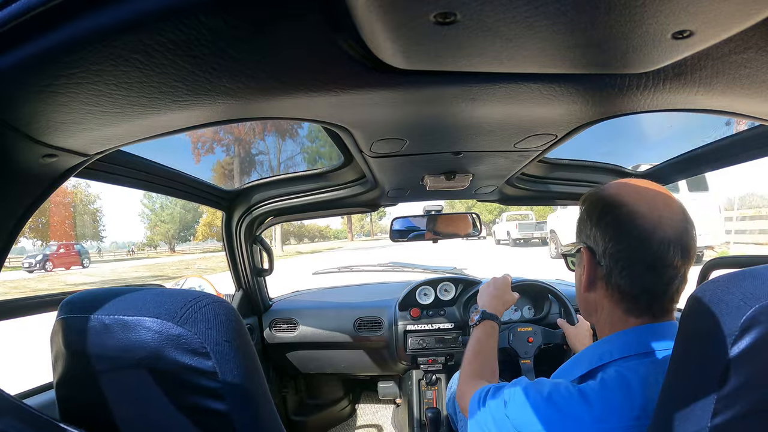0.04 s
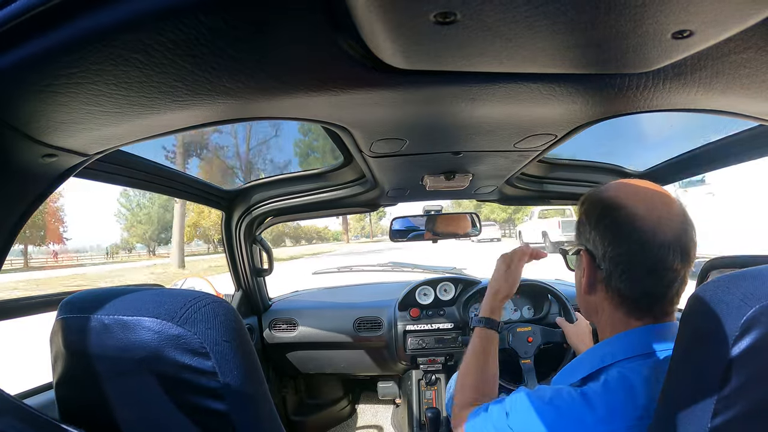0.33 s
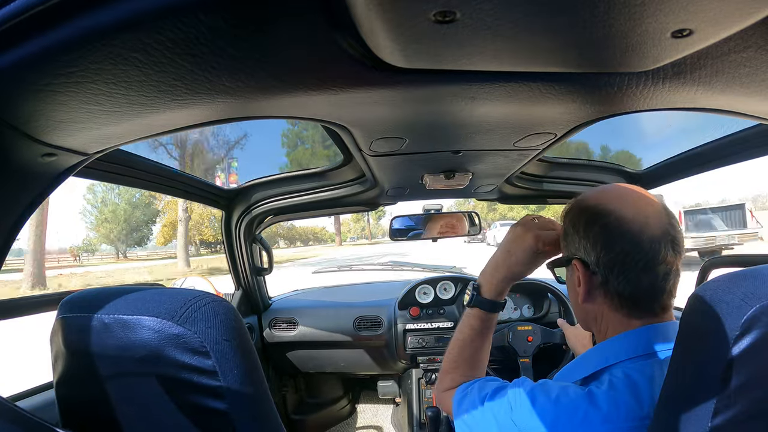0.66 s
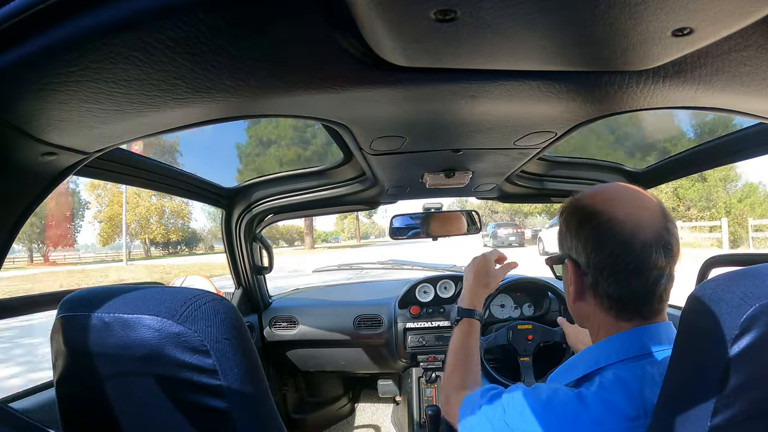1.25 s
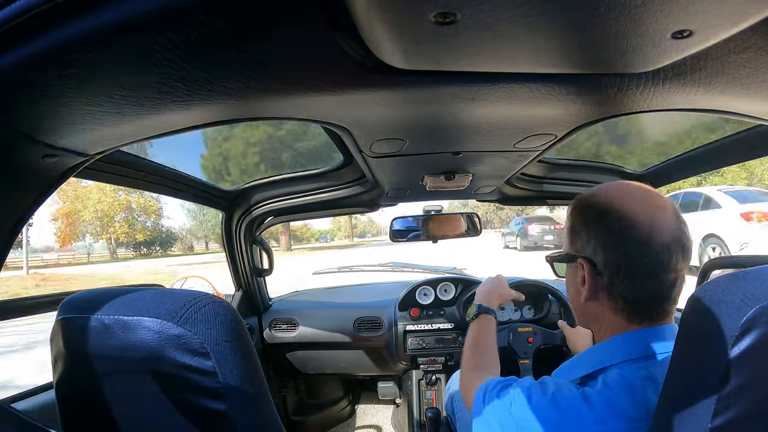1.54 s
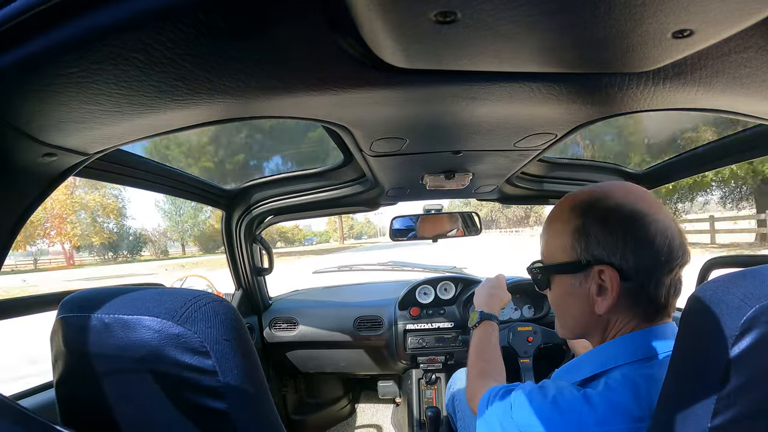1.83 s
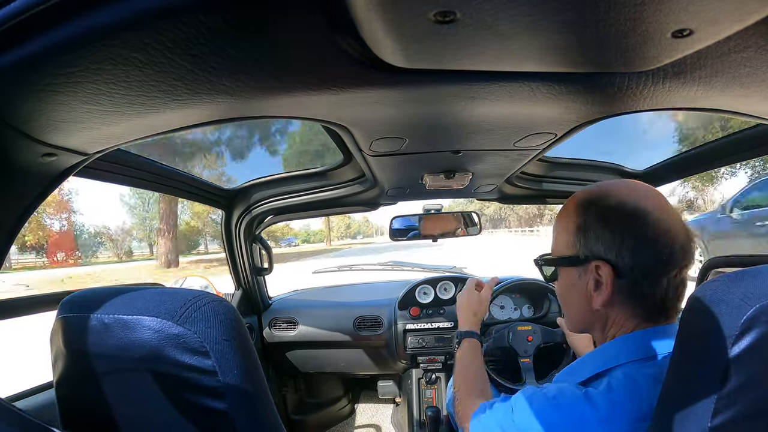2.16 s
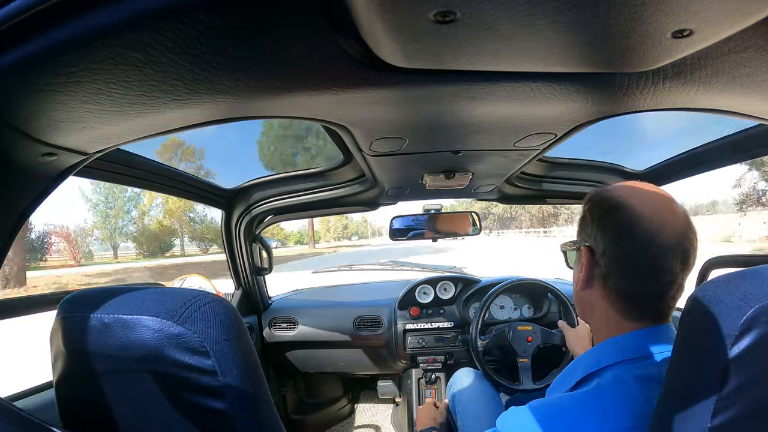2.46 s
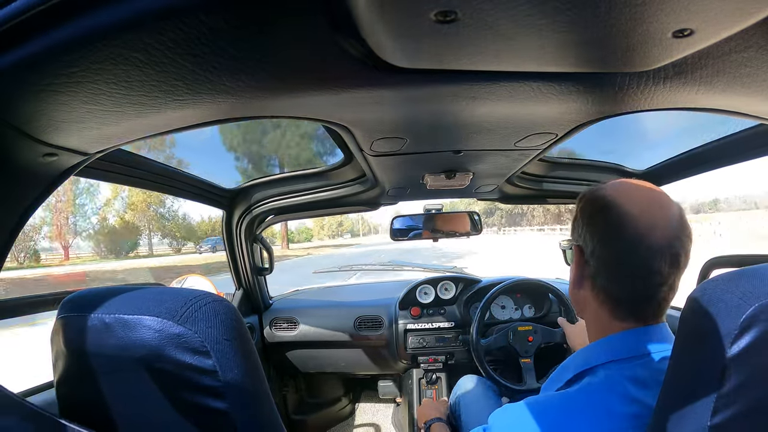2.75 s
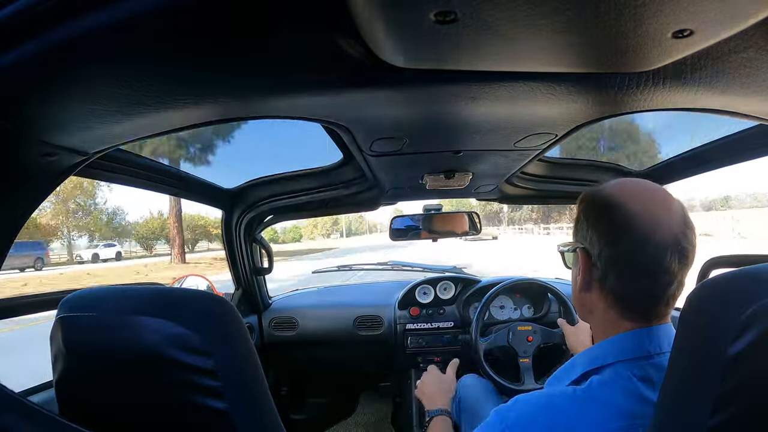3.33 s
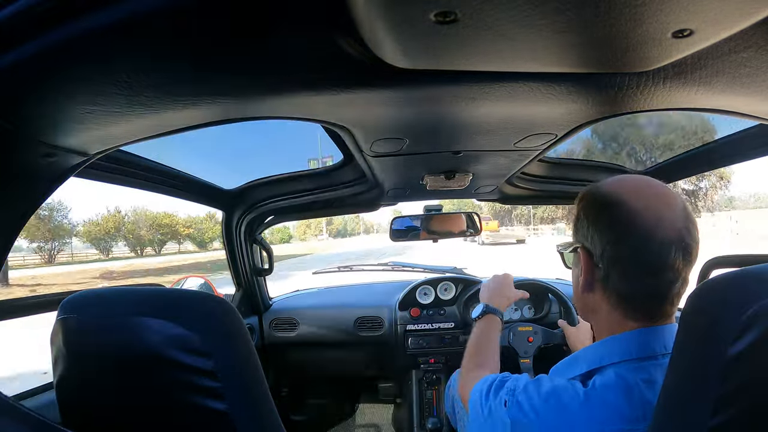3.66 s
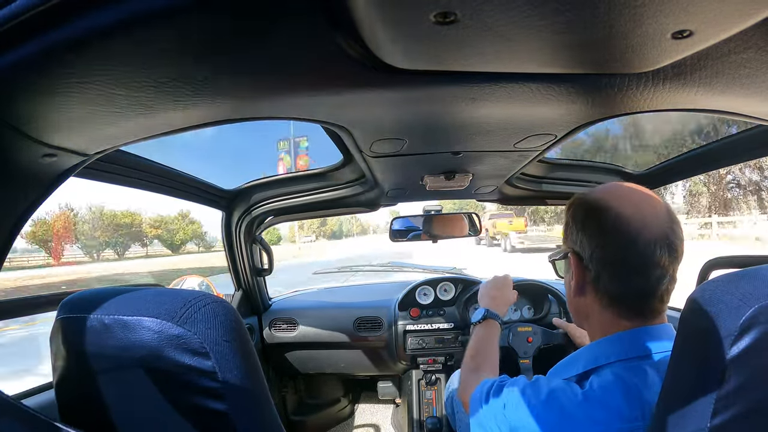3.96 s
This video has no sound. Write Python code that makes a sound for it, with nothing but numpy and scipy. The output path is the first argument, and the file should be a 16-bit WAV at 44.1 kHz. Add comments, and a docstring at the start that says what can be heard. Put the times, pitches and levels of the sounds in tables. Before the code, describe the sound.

A small car's engine drones and climbs steadily over low road rumble, heard from behind the seats. The throttle lifts for a gear change, the turbo lets out a hiss and quick falling chirps, and the engine pulls again.

```python
"""Inside a small car on the move, a stereo microphone behind the seats, road rumble all around.
The three-cylinder turbo engine pulls, its orders sweeping through the cabin's resonances, while
intake air rushes and the turbo and alternator whine faintly. Near 2.8 s the throttle lifts for a
gear change: trapped boost spits and flutters in falling chirps, the revs sink, then the load returns."""
import sys
import numpy as np
from scipy import signal
from scipy.fft import rfft, irfft
from scipy.io import wavfile
from scipy.ndimage import uniform_filter1d, minimum_filter1d

SR = 44100
rng = np.random.default_rng(int(sys.argv[2]) if len(sys.argv) > 2 else 0)


def wav_out(sig):
    """Save sig, one row per channel (or a flat mono array), as 16-bit PCM at SR to the path in sys.argv[1]."""
    wavfile.write(sys.argv[1], SR, np.round(np.clip(np.atleast_2d(sig).T, -1, 1) * 32767).astype(np.int16))


N = 176400
T, HZ = np.arange(N) / SR, np.fft.rfftfreq(N, 1 / SR)
RELEASE_S = 2.768  # the trapped boost starts to escape


def amp(db):
    """Decibels to gain."""
    return 10 ** (np.asarray(db) / 20)


def unit(x):
    """Scales to rms 1."""
    return x / np.sqrt(np.mean(x ** 2) + 1e-20)


def curve(rows, column=1):
    """One column of a time table at every sample."""
    rows = np.asarray(rows, float)
    return np.interp(T, rows[:, 0], rows[:, column])


def spectrum(rows, hz=HZ):
    """A frequency table, interpolated on a log axis."""
    f, value = np.transpose(rows)
    return np.interp(np.log(hz + 1), np.log(f + 1), value)


def drift(rate_hz):
    """Random wander of rms 1, mostly slower than rate_hz."""
    return unit(irfft(rfft(rng.standard_normal(N)) / np.sqrt(1 + (HZ / rate_hz) ** 4), N))


def noise(gain):
    """Stereo noise of rms 1 with a given spectrum, near mono in the bass."""
    # likeness of the microphone's two sides: f/Hz, correlation
    likeness = [(25, 1), (125, 0.98), (250, 1), (500, 0.74), (1000, 0.86), (2000, 0.56), (4000, 0.82),
                (8000, 0.85), (12000, 0.44)]
    left, other = rfft(rng.standard_normal((2, N)))
    alike = spectrum(likeness)
    right = alike * left + np.sqrt(1 - alike ** 2) * other
    return unit(irfft(np.array([left, right]) * gain, N))


def resonance(hz, width_hz):
    """Complex response of one mode."""
    return 1 / (1 + 2j * (HZ - hz) / width_hz)


def throb(hz, width_hz, evenness):
    """A narrow resonance shaken at random, its swells partly evened out."""
    shaken = signal.hilbert(noise(abs(resonance(hz, width_hz * 2)) ** 3))
    power = np.mean(abs(shaken) ** 2, 0)
    return unit(shaken.real / (power + .1) ** (evenness / 2))


def cabin_echo(x, t60=.16, wet_db=-3):
    """Direct sound plus dense, short reflections from glass and trim near the microphone."""
    t = T[:SR // 4]
    taps = rng.standard_normal((2, len(t))) * (rng.random((2, len(t))) < .05)
    taps *= (t > .002) * amp(-60 * t / t60)
    taps *= amp(wet_db) / np.linalg.norm(taps, axis=1, keepdims=True)
    return x + signal.fftconvolve(np.atleast_2d(x), taps, axes=1)[:, :N]


def engine(cycle_hz, cycles, load_db, waver=.14, jitter_cycles=.0016, growl_hz=660, growl_width_hz=70):
    """Three firings a cycle make slightly uneven orders, coloured by the cabin on the way back."""
    # low orders: multiple of the cycle rate, base level/dB, dB per dB of load
    orders = [(2, -23.5, 0.59), (3, -27.5, 0.7), (4, -25.5, 0.87), (5, -27, 0.65), (6, -21.5, 1.4),
              (7, -38, 1.2), (8, -48.5, .4), (9, -35.5, 1.86), (10, -50.5, 2.7), (11, -52.5, 1),
              (12, -37, 3.7), (13, -46, 0.5), (14, -46, 1.7), (15, -46.5, 0.69), (16, -44, 1.3),
              (17, -40.5, 0.9), (18, -46, 1.1)]
    # pumping against the shut throttle: multiple of the cycle rate, level/dB
    pumping_orders = [(2, -25), (3, -31), (4, -32), (6, -31)]
    # pumping starts, is full, starts to fade, has gone: t/s
    pumping_times = [2.76, 3.05, 3.32, 3.46]
    # cabin response from engine to microphone: f/Hz, gain/dB
    cabin = [(75, 2), (85, -3), (95, 4), (110, 6), (122, -2.5), (135, 0), (158, -2.5), (200, -7),
             (228, 1.5), (248, 0.5), (270, 2.5), (300, 0), (352, 5), (385, -3.5), (405, 11), (425, -2.5),
             (440, 0.5), (470, -12.5), (505, 1.5), (550, 4.5), (592, 4.5), (612, 11), (634, 3), (655, 14),
             (672, 15.5), (692, 11), (732, 3.5), (757, -7), (790, -3), (920, -3), (2000, -4.5)]
    # lift of the band around growl_hz: t/s, gain/dB
    growl = [(0, -5), (.35, -2), (.47, 4), (.8, 2.5), (1.13, 1), (1.25, -2), (1.6, -.5), (2.03, -5),
             (2.16, 3), (2.66, -.5), (2.76, 6), (2.86, -2), (3.3, -8), (3.68, 9), (4, 7)]
    # upper orders fall 12 dB an octave; every third, a firing harmonic, stands out
    upper = [(k, -47.5 - 12 * np.log2(k / 20) + 5.5 * (k % 3 == 0), 1) for k in range(19, 50)]
    cycles = cycles + jitter_cycles * drift(24)
    coasting = np.interp(T, pumping_times, [0, 1, 1, 0])
    out, growl_db = np.zeros((2, N)), curve(growl)
    for order, db, follows in orders + upper:
        hz = order * cycle_hz
        colour_db = spectrum(cabin, hz) + growl_db / (1 + ((hz - growl_hz) / growl_width_hz) ** 4)
        firing = amp(db + follows * load_db + colour_db)
        pumping = coasting * amp(dict(pumping_orders).get(order, -np.inf))
        level = np.hypot(firing, pumping) * (1 + waver * drift(10.3))
        phase = 2 * np.pi * (order * cycles + rng.random())
        spread = .16 * np.sqrt(order / 10) * rng.choice([-1, 1])
        out += np.sqrt(2) * level * np.cos([phase + spread, phase - spread])
    return out


def rush(cycles, load_db, level_db=-34.5, pulsing=.067, flicker_db=.85):
    """Intake and mechanical noise pulses with the crankshaft; panels and ducts ring with the load."""
    # colour of the rush: f/Hz, relative level/dB
    colour = [(120, -8), (250, 0), (400, 6.5), (520, -1), (800, -3), (1100, -3.5), (1800, -8.5),
              (2200, -13), (3000, -12), (4000, -14.5), (5400, -18.5), (5800, -22), (7700, -26), (8400, -31),
              (10300, -35), (11200, -40.5), (12200, -36.5), (13500, -46.5), (15000, -60.5)]
    # swell of the rush: t/s, gain/dB
    swell = [(0, -7), (.2, -1), (.5, 1.5), (1.2, 2), (2, 0.5), (2.75, 3), (2.85, 3), (3.2, -4.5), (3.5, -8),
             (3.8, -6), (4, -2)]
    # panel and duct modes: f/Hz, width/Hz, base level/dB, dB per dB of load
    modes = [(663.7, 52, -41, .75), (3125, 14, -61, 0.34), (5360, 150, -62.5, .6)]
    crank_pulse = 1 + pulsing * np.cos(4 * np.pi * cycles)  # two turns to a cycle
    air = unit(cabin_echo(crank_pulse * noise(amp(spectrum(colour))), wet_db=-4))
    air *= amp(level_db + curve(swell) - flicker_db * drift(25))
    return air + sum(amp(db + follows * load_db) * noise(resonance(hz, width * 1.6) ** 2)
                     for hz, width, db, follows in modes)


def road(roar_db=-22.5, swell_db=.4):
    """Tyre roar, the boom of the body shaking on its tyres and the drone of the cabin air."""
    # tyre roar in the cabin: f/Hz, relative level/dB
    colour = [(10, -16.5), (40, -9.5), (58, -11.5), (75, -5.5), (100, -6), (130, -10.5), (185, -17.5),
              (240, -17.5), (330, -21), (480, -30.5), (680, -31), (850, -34), (1350, -36), (1900, -40),
              (2200, -44.5), (4000, -54.5), (7500, -61.5), (10000, -70.5), (12500, -74.5), (15000, -93)]
    # body boom: t/s, level/dB
    boom_level = [(0, -37), (.22, -13.5), (.3, -16), (.7, -17), (1.55, -14.5), (2.2, -19.5), (2.72, -16.5),
                  (3, -18.5), (3.4, -16.5), (4, -15)]
    # cabin drone: t/s, level/dB
    drone_level = [(0, -16.5), (.2, -29), (.35, -27), (.6, -24), (.9, -15), (1.2, -29), (1.75, -44),
                   (2.2, -19.5), (2.6, -17), (3, -20.5), (3.25, -27.5), (3.65, -18), (4, -21.5)]
    roar = amp(roar_db + swell_db * drift(3.5)) * noise(amp(spectrum(colour)))
    boom = amp(curve(boom_level)) * throb(30.4, width_hz=16, evenness=.47)
    drone = amp(curve(drone_level)) * throb(87.5, width_hz=18.3, evenness=.74)
    return roar + boom + drone


def flutter(fuzz_hz=85, puff_db=-12.5, left_db=-.5, right_db=-1.5):
    """Trapped boost escapes in surges: each a puff and a breathy whistle, lower as the turbo slows."""
    # surges: start t/s, length/s, relative level/dB, roughness (0-1)
    chirps = [(2.771, .044, -17, .3), (2.832, .045, -21.5, .55), (2.888, .041, -23, .55),
              (2.945, .038, -20, .15), (3.006, .03, -29, .55), (3.059, .035, -32, .5),
              (3.106, .029, -34, .45), (3.155, .036, -38.5, .4), (3.203, .038, -38, .4),
              (3.259, .034, -38, .3), (3.305, .035, -41, .3), (3.36, .035, -40, .3)]
    # whistle pitch as the turbo runs down: t/s, f/Hz
    rundown = [(2.77, 1955), (2.815, 1935), (2.828, 1730), (2.875, 1705), (2.89, 1590), (2.925, 1560),
               (2.942, 1472), (2.985, 1466), (3.02, 1368), (3.075, 1288), (3.12, 1205), (3.175, 1100),
               (3.27, 965), (3.39, 850)]
    # escaping air: f/Hz, relative level/dB
    puff_colour = [(600, -13), (1300, 8.5), (1930, 8.5), (2060, -13), (2750, 3), (3100, -17), (3700, -6),
                   (5500, -27), (8000, -34), (12000, -40), (15000, -44)]
    # intake pipe modes: f/Hz, width/Hz, gain/dB
    pipe_modes = [(1590, 22, -5), (1850, 30, -12), (1945, 30, -10)]
    whistle, surge = np.zeros(N), np.zeros(N)
    carrier = np.exp(2j * np.pi * np.cumsum(curve(rundown)) / SR)
    fuzz = drift(fuzz_hz) + 1j * drift(fuzz_hz)
    for start, length, db, rough in chirps:
        elapsed = start - RELEASE_S  # later chirps have less octave and less air
        octave = amp(-16.5 - 75 * elapsed)
        progress = np.clip((T - start) / length, 0, 1)
        swell = amp(db) * np.sqrt(abs(np.sin(np.pi * progress)))
        tone = carrier * (np.sqrt(2 * (1 - rough)) + np.sqrt(rough) * fuzz)
        whistle += swell * (tone + octave * tone ** 2 / np.sqrt(2)).real
        surge += swell * amp(-9 * elapsed)
    puff = amp(puff_db) * surge * noise(amp(spectrum(puff_colour)))[0]
    pipe = sum(amp(db) * resonance(hz, width) for hz, width, db in pipe_modes)
    ring = irfft(rfft(puff * 6 + whistle * .19) * pipe, N)
    return amp([[left_db], [right_db]]) * cabin_echo(whistle + puff + ring, t60=.22, wet_db=-5)


def spit(rise_s=.026, decay_s=.05, corner_hz=3600):
    """A short hiss of air opens the flutter."""
    age = np.maximum(T - RELEASE_S, 0)
    hiss = noise((HZ / corner_hz) ** 2 / (1 + (HZ / corner_hz) ** 5.5))
    return amp(-32.5) * np.minimum(age / rise_s, 1) * np.exp(-age / decay_s) * hiss


def turbo_whine(waver=.024, flicker_db=2):
    """The compressor's thin, breathy whine rises as boost builds, and an intake duct whistles."""
    # compressor whine: t/s, f/Hz, level/dB
    whine = [(0, 10500, -87), (.2, 12000, -70.5), (.35, 12300, -75), (.8, 12650, -74.5), (1.2, 12900, -90),
             (2.7, 13400, -86), (3.1, 11000, -100)]
    # duct whistle: t/s, level/dB
    duct_level = [(0, -70), (.8, -62), (1.7, -58), (2.2, -55), (2.72, -52), (2.85, -65), (3.4, -75),
                  (3.7, -63), (4, -66)]
    hz = curve(whine) * (1 + waver * drift(400))
    tone = np.sin(2 * np.pi * np.cumsum(hz) / SR)
    blades = amp(curve(whine, column=2)) * unit(cabin_echo(tone))
    duct = amp(curve(duct_level) + flicker_db * drift(14)) * throb(5310, width_hz=24, evenness=.26)
    return blades + duct


def alternator(cycles, order=47):
    """A faint tone locked to the engine, swelling and fading as it climbs."""
    # alternator whine: t/s, level/dB
    level = [(0, -70), (.95, -63), (1.13, -49), (1.35, -59), (1.9, -54.5), (2.6, -53), (2.9, -68), (4, -72)]
    tone = np.sin(2 * np.pi * order * cycles)
    return amp(curve(level)) * unit(cabin_echo(tone, wet_db=-7))


def scene():
    """Engine, road and turbo as heard from behind the seats."""
    # engine cycle rate, half the crankshaft's: t/s, f/Hz
    speed = [(0, 36.4), (.5, 39.2), (1, 41.2), (1.5, 44), (2, 46.2), (2.72, 49.4), (2.77, 49.3),
             (2.85, 47.3), (3.2, 41.2), (3.4, 38.2), (3.68, 36.6), (4, 37.4)]
    # engine load: t/s, relative level/dB
    load = [(0, -3.5), (.2, -2.5), (.5, -1.5), (.75, -0.5), (1.05, 3), (1.4, -1.5), (1.85, -0.5),
            (2.3, -0.5), (2.66, 0), (2.76, -2), (2.81, -11.5), (3.32, -13.5), (3.48, -24), (3.68, -17),
            (4, -11.5)]
    cycle_hz, load_db = curve(speed), curve(load)
    cycles = np.cumsum(cycle_hz) / SR
    driving = engine(cycle_hz, cycles, load_db) + rush(cycles, load_db) + road()
    return driving + turbo_whine() + flutter() + spit() + alternator(cycles)


def record(dry, limit_db=-6.5, ratio=4, window_s=.02, cutoff_hz=15500):
    """The microphone's left side is slightly louder; a limiter eases peaks, a low-pass trims the top."""
    # left over right: f/Hz, level/dB
    balance = [(25, 0.43), (250, 0.61), (1000, 1.7), (4000, 2), (8000, 2.3), (12000, .6)]
    picked_up = irfft(rfft(dry) * amp(np.array([[.5], [-.5]]) * spectrum(balance)), N)
    window = int(window_s * SR)
    over_db = np.maximum(20 * np.log10(abs(picked_up).max(0) + 1e-9) - limit_db, 0)
    held_db = minimum_filter1d(-over_db * (1 - 1 / ratio), window)
    limited = picked_up * amp(uniform_filter1d(held_db, window))
    lowpass = signal.firwin(511, cutoff_hz, window=("kaiser", 9), fs=SR)
    return signal.oaconvolve(limited, lowpass[None], "same")


dry = scene()
out = record(dry)
wav_out(out)
```